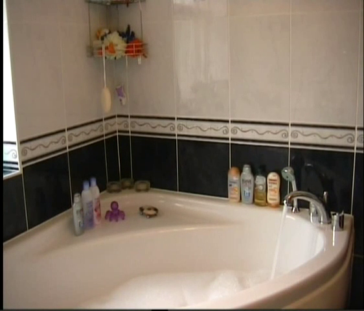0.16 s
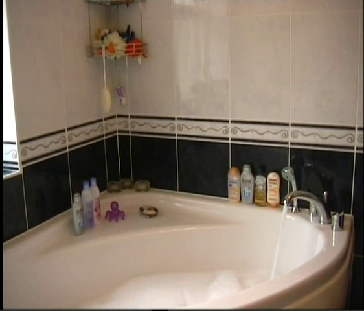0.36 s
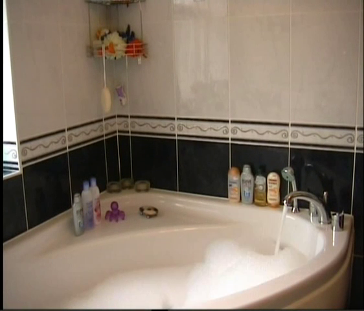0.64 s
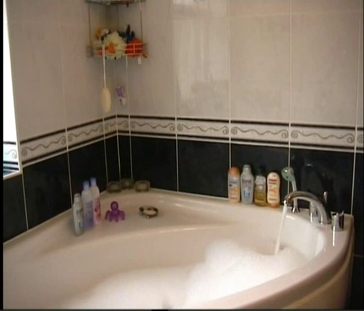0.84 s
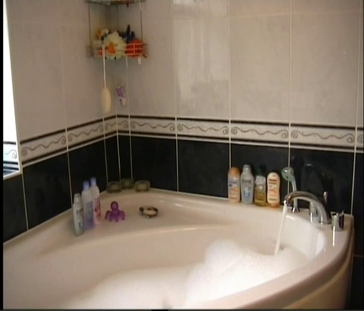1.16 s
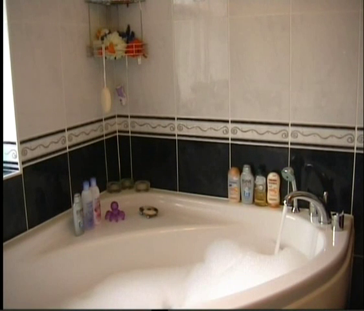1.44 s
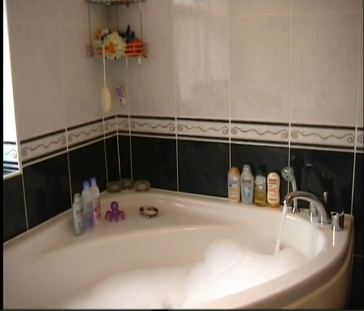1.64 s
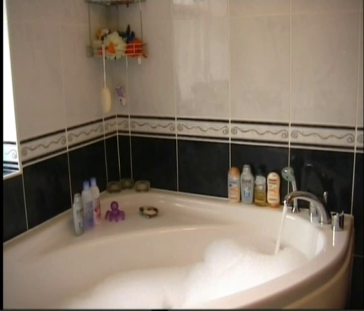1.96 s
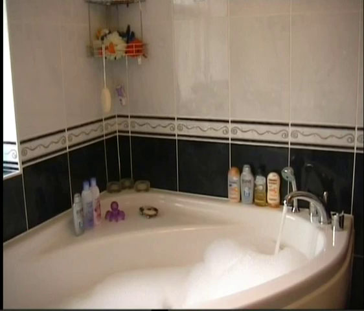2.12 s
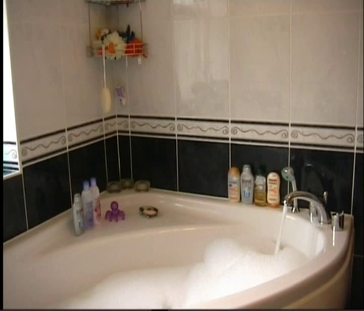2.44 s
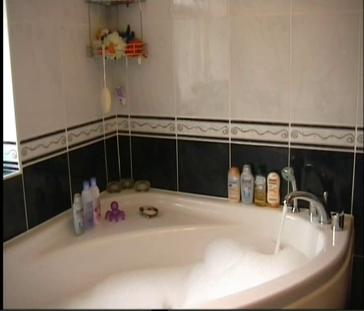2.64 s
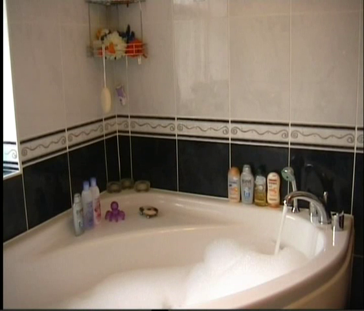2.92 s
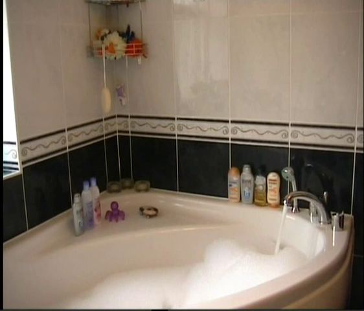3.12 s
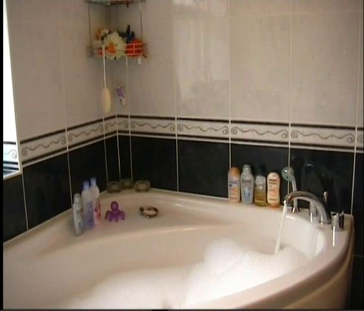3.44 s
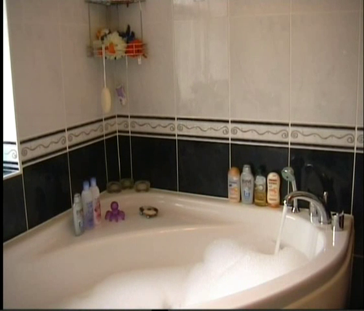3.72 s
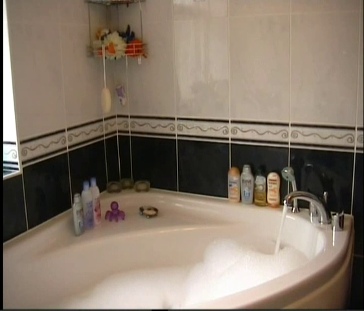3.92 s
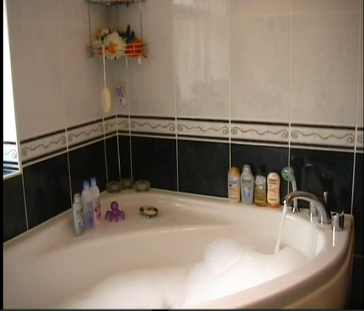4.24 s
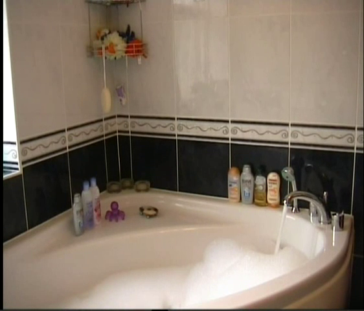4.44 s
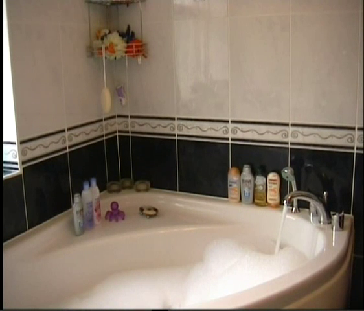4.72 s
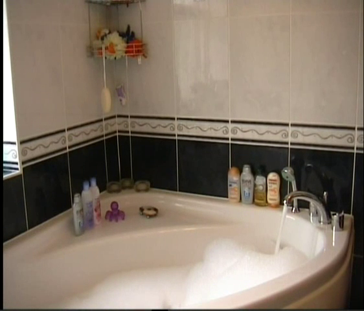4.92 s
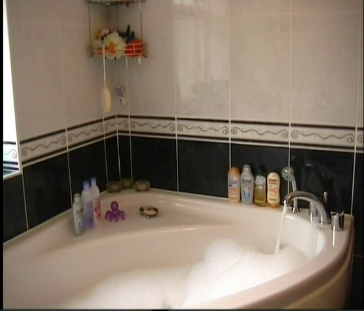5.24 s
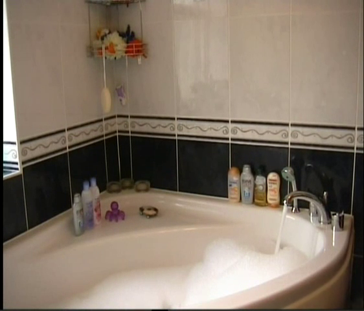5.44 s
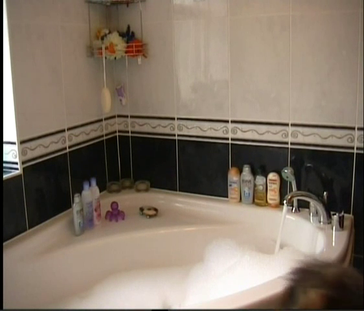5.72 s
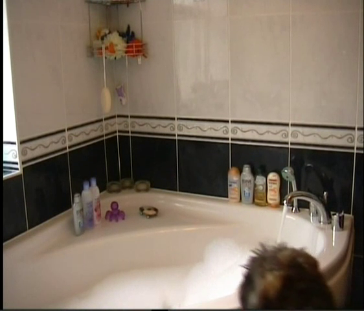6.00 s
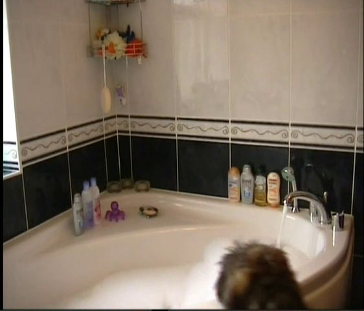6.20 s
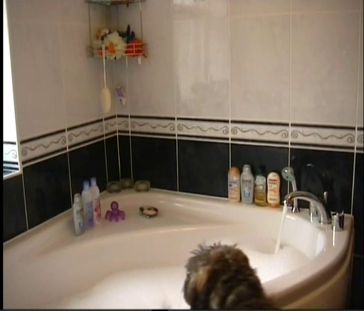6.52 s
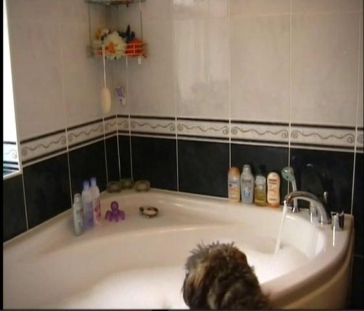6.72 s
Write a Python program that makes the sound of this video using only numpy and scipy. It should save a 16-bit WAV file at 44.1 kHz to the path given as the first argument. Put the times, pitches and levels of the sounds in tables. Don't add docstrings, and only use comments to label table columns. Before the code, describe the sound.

Tap water hisses and splashes steadily into a foamy bath in a tiled room, with low hum, electrical buzz, soft bumps and an early silent gap.

```python
import sys
import numpy as np
from scipy import signal
from scipy.fft import rfft, irfft, next_fast_len
from scipy.io import wavfile
from scipy.ndimage import uniform_filter1d, map_coordinates

SR = 44100
rng = np.random.default_rng(int(sys.argv[2]) if len(sys.argv) > 2 else 0)


def convert_level_to_amplitude(level_db):
    exponent = np.asarray(level_db, float) / 20
    return 10 ** exponent


def inscribe(sig):
    pcm = np.round(np.clip(np.atleast_2d(sig).T, -1, 1) * 32767)
    wavfile.write(sys.argv[1], SR, pcm.astype(np.int16))


N = 302519

# (frequency [Hz], level [dB per Hz])
SPRAY_MIDDLE = [(1400, -31.5), (2400, -8.5), (2730, -6.5), (2950, -6), (3160, -7), (3650, -2.5),
                (4250, -3.5), (4720, -1.5), (5150, -2), (6400, -3), (7400, -3), (10200, -4), (11200, -10.5),
                (12900, -12.5)]
# (frequency [Hz], level [dB per Hz])
SPRAY_WIDTH = [(1400, -60), (2700, -29.5), (3700, -15), (4500, -15), (5500, -10.5), (6500, -6), (7460, -2),
               (9000, -9), (10500, -8), (12000, -15.5), (12900, -15)]
# (frequency [Hz], level [dB per Hz])
SPLASH_COLOUR = [(320, -33.5), (550, -1), (650, -4.5), (800, -3), (900, -4), (1200, 1.5), (1420, 0),
                 (1800, -1), (2150, -0.5), (2600, -14), (3380, -39), (5700, -120)]
# (frequency [Hz], level [dB per Hz])
GURGLE_MIDDLE = [(6, -30), (18, -0.5), (35, -2.5), (60, -1.5), (80, 4.5), (120, -7), (170, -0.5), (240, -1),
                 (300, -1), (400, -2.5), (480, -2.5), (560, -5.5), (750, -34)]
# (frequency [Hz], level [dB per Hz])
GURGLE_WIDTH = [(12, -41.5), (20, -15), (49, -9.5), (97, 2), (145, -9.5), (216, -11), (392, -11),
                (475, -16.5), (700, -11), (910, -45), (1540, -120)]
# (frequency [Hz], share [-1 to 1, + = left])
STEREO_LEAN = [(100, 0.15), (180, -.5), (500, -0.031), (3000, -0.25), (5200, .1), (6000, -0.36),
               (6800, -.4), (7500, .2), (9000, .3), (12000, .4)]
# (frequency [Hz], time to fall 60 dB [s])
TILE_ECHO = [(200, 0.19), (2000, 0.3), (10000, 0.1)]
# (frequency [Hz], width [Hz], level over the noise [dB])
TUB_RINGS = [(218, 25, -5), (1155, 30, -5), (1212, 30, -2), (2232, 35, -1), (2510, 35, -1), (2970, 70, -6),
             (3675, 50, -8), (4110, 35, -5), (4800, 40, -6)]
# (time [s], level [dB])
PUMP_LOAD = [
    (0, -38),
    (2, -41),
    (4, -47),
    (5.8, -43),
    (6.86, -38),
]
# (middle [s], level [dB], half length [s])
PIPE_MOANS = [
    (2.95, -45, 0.37),
    (3.65, -51, .3),
    (4.6, -53, .25),
]
# (train starts [s], first pulse [s])
PULSE_TRAINS = [
    (0, .0008),
    (1, .0030),
]
# (time [s], peak level [dB], pitch [Hz])
PAW_BUMPS = [(.37, -30, 150), (.515, -30, 340), (.625, -29, 150), (2.78, -31, 250), (2.959, -30, 200),
             (3.085, -21, 245), (5.645, -22, 153), (5.935, -30, 790), (6.418, -28, 290), (6.43, -28, 140),
             (6.79, -30, 290)]
# (time [s], level [dB], top [Hz], half length [s])
TREBLE_TICKS = [(2.533, -46, 15800, .005), (2.56, -62, 14500, .002), (2.674, -61.5, 14500, .012),
                (3.605, -56.5, 14200, .008), (4.197, -61.5, 14200, .008), (5.285, -40, 13600, .016)]

SPRAY_DB, SPLASH_DB, GURGLE_DB = -32.5, -43, -42.5
PUMP_HZ = 100.04
FAN_HZ, FAN_DB, FAN_SINKS_DB_PER_S = 199.83, -42, 1
MOAN_HZ = 81.6
BUMP_T60_S = .065
CUT_S, BACK_S = .7196, 1.4775
RESIDUE_DB, RESIDUE_S, RESIDUE_FADE_DB_PER_S = -43, .056, 2200


def unit(x):
    return x / np.sqrt(np.mean(np.abs(x) ** 2, axis=-1, keepdims=True) + 1e-20)


def along(points, hz):
    f, v = np.transpose(points)
    return np.interp(np.log(hz + 1), np.log(f + 1), v)


def wobble(rate):
    knots = rng.standard_normal(int(N * rate / SR) + 4)
    return map_coordinates(knots, [np.arange(N) * rate / SR])


def filtered(x, response):
    m = next_fast_len(N + SR // 2)
    return irfft(rfft(x, m) * response(np.fft.rfftfreq(m, 1 / SR)), m)[..., :N]


def patchy(patchy_db):
    z = signal.stft(rng.standard_normal(N), nperseg=512)[2]
    field = uniform_filter1d(rng.standard_normal(z.shape), size=6, axis=0)
    field = uniform_filter1d(field, size=10, axis=1)
    patches = z * convert_level_to_amplitude(patchy_db * field / field.std())
    return unit(signal.istft(patches, nperseg=512)[1][:N])


def bubbles(count, centre_hz, spread, cycles, scatter_db, size):
    when, pitch, big = rng.random((count, 3)).T
    hz = centre_hz * np.exp(spread * 2 * (2 * pitch - 1))
    hz = np.clip(hz, 40, 14000)[:, None]
    turns = hz * np.arange(size) / SR
    age = turns / cycles
    swell = age * np.exp(-3 * age) * np.sqrt(hz)
    ring = np.sin(2 * np.pi * turns * (1 + 0.089 * age)) * swell
    ring *= convert_level_to_amplitude(-scatter_db * np.log(big + 0.0013))[:, None]
    at = (when * N).astype(int)[:, None] + np.arange(size)
    return unit(np.bincount(at.ravel(), ring.ravel(), N + size)[:N])


def bathroom(x, direct_db, spread_db):
    hz, t, z = signal.stft(rng.standard_normal((2, SR // 2)), SR, nperseg=256)
    fade = convert_level_to_amplitude(-60 * t / along(TILE_ECHO, hz)[:, None])
    tail = signal.istft(z * unit(fade), SR, nperseg=256)[1]
    tail /= np.linalg.norm(tail, axis=1)[:, None]
    tail[0, 0] += convert_level_to_amplitude(direct_db)
    jet = unit(signal.fftconvolve(x[None], tail, axes=1)[:, :N])
    return jet + convert_level_to_amplitude(spread_db) * rng.standard_normal((2, N))


def stereo(paths, spectrum, side_spectrum, side_db):
    def side_response(hz):
        lean = np.clip(along(STEREO_LEAN, hz), -.95, .95)
        return convert_level_to_amplitude(along(side_spectrum, hz)) * [lean, np.sqrt(1 - lean ** 2)]

    middle = filtered(paths[0], lambda hz: convert_level_to_amplitude(along(spectrum, hz)))
    side = convert_level_to_amplitude(side_db) * unit(filtered(paths, side_response).sum(0))
    return unit(middle) + np.array([side, -side])


def water():
    surge = wobble(5)
    spray = patchy(patchy_db=-0.05)
    spray += convert_level_to_amplitude(-10.5) * bubbles(count=12000, centre_hz=6090, spread=.45, cycles=4.3, scatter_db=1.5, size=64)
    spray = bathroom(spray * convert_level_to_amplitude(.3 * surge), direct_db=6.5, spread_db=-4.5)
    spray = stereo(spray, SPRAY_MIDDLE, SPRAY_WIDTH, side_db=-2.4)

    splash = patchy(patchy_db=0.0)
    splash += convert_level_to_amplitude(-12.5) * bubbles(count=1800, centre_hz=1295, spread=0.41, cycles=9, scatter_db=1, size=512)
    splash = bathroom(splash * convert_level_to_amplitude(0.48 * surge), direct_db=2.5, spread_db=-5.5)
    splash = stereo(splash, SPLASH_COLOUR, SPLASH_COLOUR, side_db=-11)

    gurgle = patchy(patchy_db=1.2)
    gurgle += convert_level_to_amplitude(-12) * bubbles(count=700, centre_hz=230, spread=.4, cycles=5, scatter_db=1.5, size=2000)
    gurgle = bathroom(gurgle * convert_level_to_amplitude(0.55 * wobble(5.1)), direct_db=5, spread_db=0)
    gurgle = stereo(gurgle, GURGLE_MIDDLE, GURGLE_WIDTH, side_db=-9)
    return convert_level_to_amplitude(SPRAY_DB) * spray + convert_level_to_amplitude(SPLASH_DB) * splash + convert_level_to_amplitude(GURGLE_DB) * gurgle


def tub(hz):
    return 1 + sum(convert_level_to_amplitude(db) / (1 + (2 * (hz - c) / w) ** 2) for c, w, db in TUB_RINGS)


def hum():
    t = np.arange(N) / SR
    load_db = np.interp(t, *np.transpose(PUMP_LOAD))
    turn = 2 * np.pi * PUMP_HZ * t
    pump = convert_level_to_amplitude(load_db + 0.86 * wobble(6.6)) * np.cos(turn + 0.3 * wobble(3) - .6)
    fan_level = convert_level_to_amplitude(FAN_DB - FAN_SINKS_DB_PER_S * t + 0.52 * wobble(4.8))
    fan = fan_level * np.cos(2 * np.pi * FAN_HZ * t + 0.15 * wobble(7) - .6)
    upper = convert_level_to_amplitude(-55) * np.cos(2 * np.pi * 300 * t + 0.3 * wobble(4.8) + 2.2)
    upper += convert_level_to_amplitude(-58) * np.cos(6 * turn + 0.63 * wobble(3))
    swell = sum(convert_level_to_amplitude(db) * np.exp(-((t - s) / half) ** 2) for s, db, half in PIPE_MOANS)
    pipe = swell * np.cos(2 * np.pi * MOAN_HZ * t + 1.0 * wobble(3.5))
    return upper + pipe + pump * convert_level_to_amplitude([[0], [0]]) * 0 + pump * convert_level_to_amplitude([[.7], [-.7]]) + fan * convert_level_to_amplitude([[-.8], [.8]])


def buzz():
    t = np.arange(N) / SR
    start, first = np.transpose(PULSE_TRAINS)
    train = np.searchsorted(start, t, side="right") - 1
    since_pulse = (t - first[train]) % (1 / 50)
    flat = convert_level_to_amplitude(-30) * (since_pulse < .0016)
    spike = convert_level_to_amplitude(-26.5) * np.exp(-((since_pulse - .00027) / 0.000076) ** 2)
    droop_hz, top_hz = 60, 5000
    response = lambda hz: 1j * hz / (droop_hz + 1j * hz) / (1 + 1j * hz / top_hz)
    pulses = filtered((0.92 * flat + spike) * convert_level_to_amplitude(0.48 * wobble(8)), response)
    drum = convert_level_to_amplitude(-45 + 4.1 * wobble(5.6)) * np.cos(2 * np.pi * 150 * since_pulse + 4.62)
    return drum - pulses


def bumps():
    out, t = np.zeros(N + SR), np.arange(SR // 4) / SR
    for s, db, hz in PAW_BUMPS:
        ring = np.sin(2 * np.pi * hz * t) + 0.25 * np.sin(2 * np.pi * 1.36 * hz * t + 1)
        soft_start = 1 - np.exp(-t / .003)
        out[round(s * SR):][:len(t)] += convert_level_to_amplitude(db - 60 * t / BUMP_T60_S) * soft_start * ring
    return out[:N]


def edit():
    t = np.arange(N) / SR
    fading_s = np.clip(t - CUT_S - RESIDUE_S, 0, 1)
    trace = convert_level_to_amplitude(RESIDUE_DB - RESIDUE_FADE_DB_PER_S * fading_s)
    return np.where((t > CUT_S) & (t < BACK_S), trace, 1)


def ticks():
    out, t = np.zeros((2, N)), np.arange(N) / SR
    for s, db, top_hz, half in TREBLE_TICKS:
        near = np.abs(t - s) < half
        count = near.sum()
        band = signal.butter(6, [12800, top_hz], "band", fs=SR, output="sos")
        hiss = signal.sosfilt(band, rng.standard_normal(count))
        out[0, near] += convert_level_to_amplitude(db + 6) * np.hanning(count) * hiss
    return out


def scene():
    return filtered(water(), tub) + hum() + bumps()


def band_limit(x):
    return signal.sosfilt(signal.butter(12, 16300, fs=SR, output="sos"), x)


def record(dry):
    notch_hz, wide_hz, depth, top_hz = 5430, 330, .85, 12840
    housing = lambda hz: 1 - depth / (1 + (2 * (hz - notch_hz) / wide_hz) ** 2)
    treble_limit = lambda hz: 1 / (1 + (hz / top_hz) ** 200)
    heard = (filtered(dry, housing) + buzz()) * edit()
    return band_limit(filtered(heard, treble_limit) + ticks())


dry = scene()
out = record(dry)
inscribe(out)
```